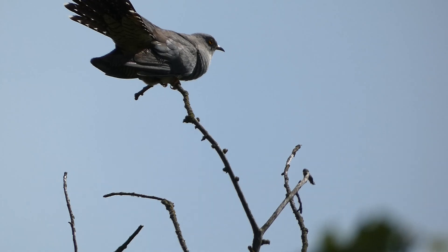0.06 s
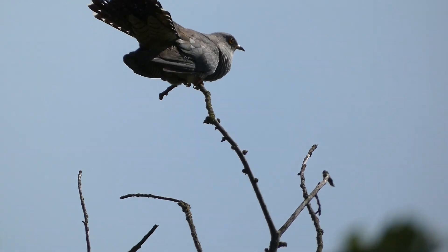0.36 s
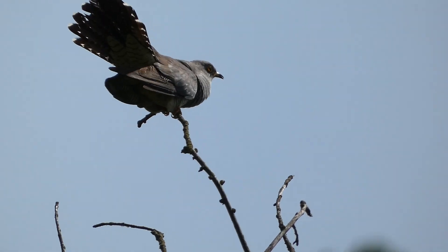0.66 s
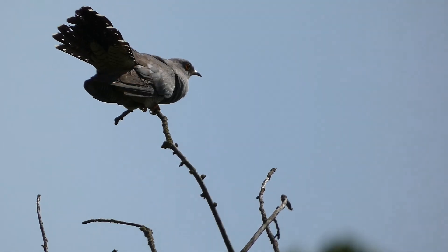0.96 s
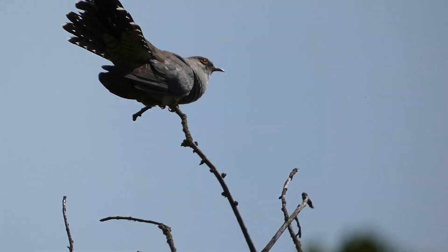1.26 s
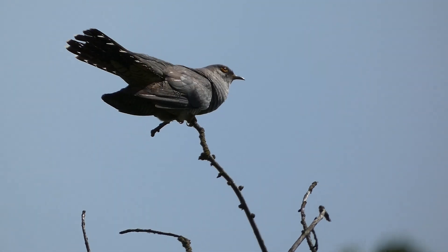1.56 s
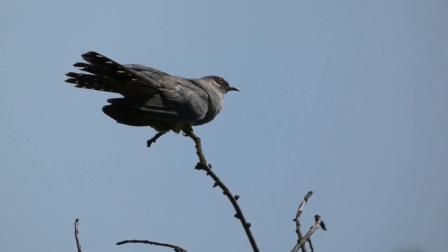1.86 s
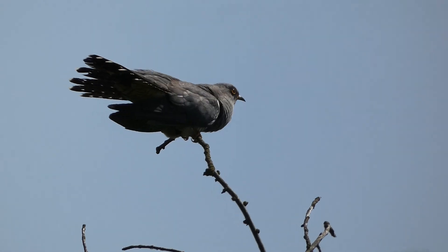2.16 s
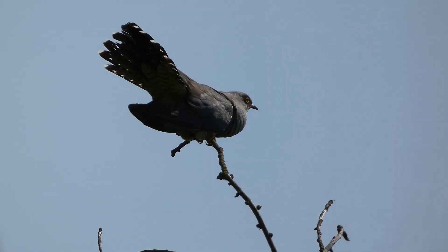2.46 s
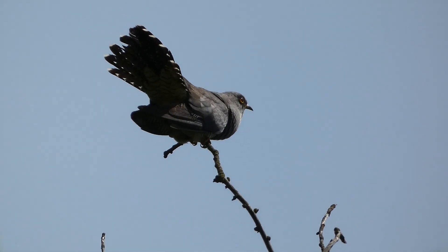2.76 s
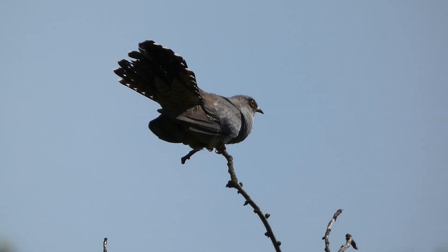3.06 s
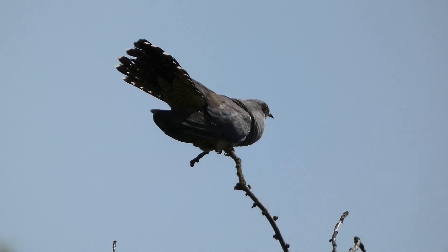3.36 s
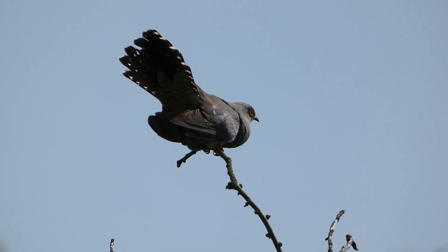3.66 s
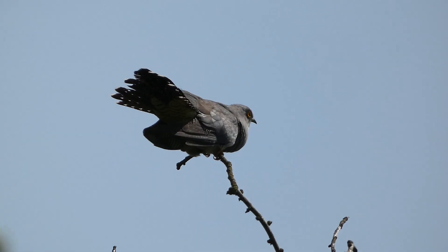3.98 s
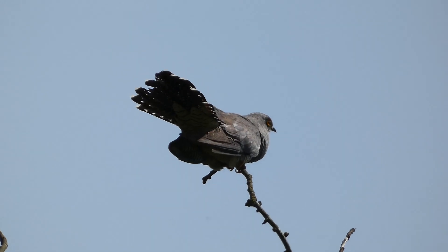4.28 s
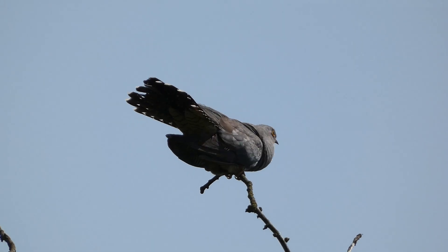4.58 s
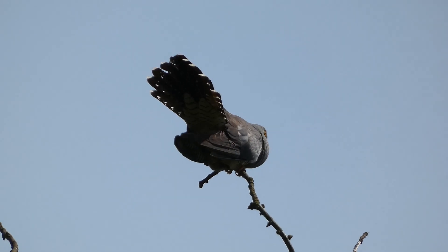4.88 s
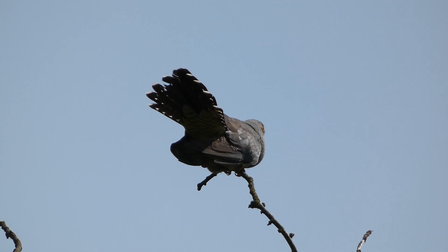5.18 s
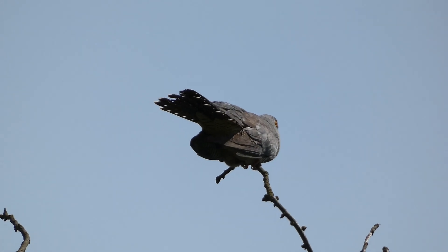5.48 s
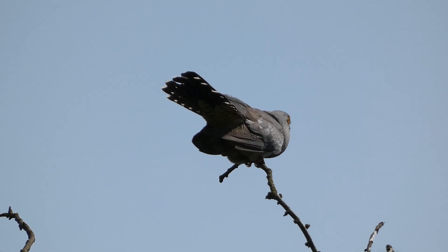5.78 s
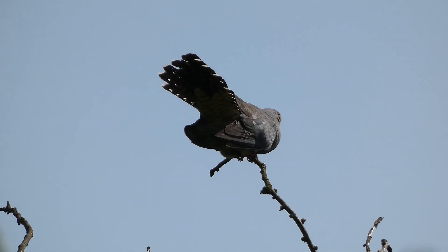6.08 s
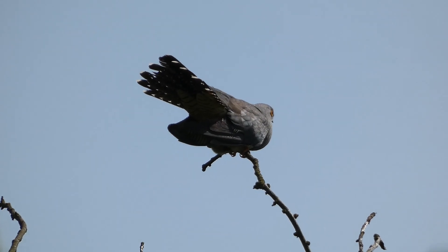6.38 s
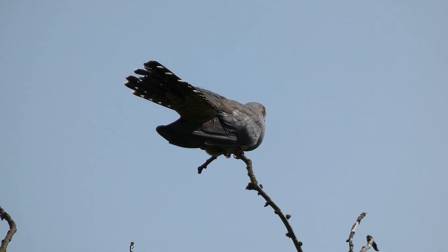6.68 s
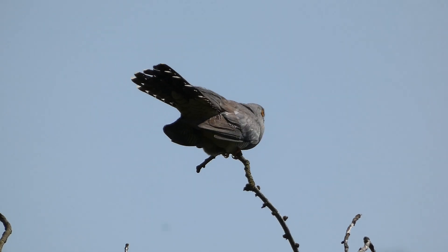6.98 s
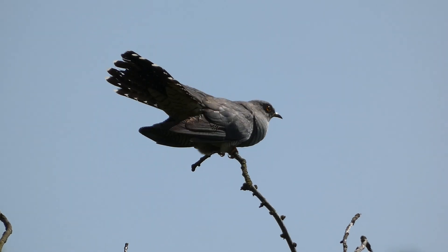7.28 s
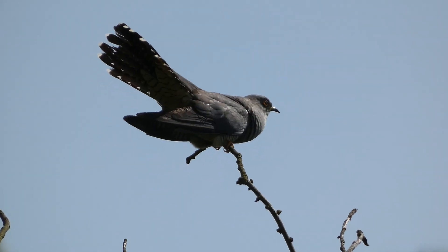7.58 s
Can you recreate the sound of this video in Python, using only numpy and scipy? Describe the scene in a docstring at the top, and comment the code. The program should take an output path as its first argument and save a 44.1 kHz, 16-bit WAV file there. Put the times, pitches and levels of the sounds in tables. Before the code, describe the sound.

Outdoors, a cuckoo near the microphone repeats its hollow, falling two-note call six times, a little over a second apart. Behind it, small birds chirp faintly, with a brief run of dry ticks early on, scattered twittering in the middle and a slightly nearer song with a trill towards the end. Far traffic makes a soft, steady wash with a thin motor whine.

```python
"""A cuckoo on a bare twig calls six times in open country: a short arched "cuck", then a level,
lower "oo", both almost pure tones from a closed bill and swollen throat.
Small songbirds whistle and tick further off, scattered by the trees, among faint rustles.
Behind them far traffic swells and fades in moving air, with a wavering motor whine and a low hum."""
import sys
import numpy as np
from scipy import signal
from scipy.fft import rfft, irfft
from scipy.io import wavfile
from scipy.ndimage import uniform_filter1d

SR = 44100
rng = np.random.default_rng(int(sys.argv[2]) if len(sys.argv) > 2 else 0)


def materialize(psi):
    """Save the field psi as 16-bit PCM at rate SR to the path in sys.argv[1].

    A 1-D psi becomes a single channel; in a 2-D psi each row is a channel.
    """
    bounded = np.clip(np.atleast_2d(psi).T, -1, 1)
    quanta = np.round(bounded * 32767).astype(np.int16)
    wavfile.write(sys.argv[1], SR, quanta)


N = 345744
T = np.arange(N) / SR

# Background noise spectra, low to high: freq_hz, density_db
RUMBLE_SPECTRUM = [(20, -19.5), (50, -11), (80, -6), (120, -0.5), (160, -2), (210, -4), (280, -9),
                   (400, -28.5)]
DRONE_SPECTRUM = [(230, -43), (300, -20.5), (350, -13), (385, -3.5), (412, 2), (450, -4.5), (500, -11),
                  (570, -27), (700, -52.5)]
ROAR_FAR_SPECTRUM = [(480, -41.5), (560, -19.5), (610, -14), (690, -3.5), (735, -4.5), (800, 3.5),
                     (860, -1), (940, -18.5), (1050, -36.5)]
ROAR_NEAR_SPECTRUM = [(400, -27.5), (480, -5.5), (550, -5.5), (665, 5), (735, 1.5), (782, 4), (850, -3),
                      (960, -15), (1100, -32)]
MURMUR_FAR_SPECTRUM = [(860, -21), (950, -6.5), (1030, -1), (1085, -18), (1165, 4), (1220, -4.5),
                       (1290, -13)]
MURMUR_NEAR_SPECTRUM = [(860, -6.5), (950, 5.5), (1030, 1), (1095, 2.5), (1170, 1), (1240, -10.5),
                        (1330, -15)]
RUSH_SPECTRUM = [(1150, -42.5), (1290, -6.5), (1410, 7), (1480, 10), (1550, 2), (1610, 8), (1680, -0.5),
                 (1760, -19.5), (1950, -42.5)]
TYRE_SPECTRUM = [(1550, -9.5), (1780, -2.5), (1910, 1), (2000, 1), (2090, 5), (2180, 4), (2330, -1),
                 (2490, -6.5), (2680, 1.5), (3000, -4), (3500, -5), (4100, -15), (4700, -35)]
HISS_SPECTRUM = [(3400, -12), (4200, -7), (4600, -5), (4950, 0.5), (5800, -3.5), (6400, -6.5), (7000, -6),
                 (7900, -14), (8600, -11), (9900, -9.5), (11500, -17), (12700, -21.5), (15200, -30)]
# Traffic envelopes, before trim and gusts: time_s, level_db
ROAR_ENVELOPE = [(0.34, -47.5), (0.7, -53.5), (1.06, -44.5), (1.42, -51.5), (1.66, -43), (2.14, -49.5),
                 (2.74, -41.5), (3.3, -42.5), (3.94, -43.5), (4.18, -35.5), (4.3, -41.5), (4.58, -37.5),
                 (4.95, -37), (5.38, -40), (5.58, -36), (5.98, -37), (6.46, -40), (7.82, -39)]
MURMUR_ENVELOPE = [(0.4, -58), (1.1, -54.5), (1.7, -56), (2.7, -60), (3.95, -50), (4.4, -55.5),
                   (5.6, -52.5), (6.6, -53.5), (7.8, -53)]
RUSH_ENVELOPE = [(0.34, -54.5), (1.42, -50), (2.98, -53), (4.06, -49.5), (6.34, -61.5), (6.58, -56.5),
                 (7.3, -62), (7.822, -60)]
TYRE_ENVELOPE = [(0.34, -61.5), (2.14, -56.5), (2.62, -55.5), (5.02, -57), (6.22, -59.5), (6.34, -56.5),
                 (7.82, -59)]
# Brief swells and dips of the roar: centre_s, half_width_s, gain_db
ROAR_BUMPS = [(.84, 0.028, 10), (1.08, 0.066, -1.5), (4.81, 0.091, -10.5), (7.6, 0.034, -7.5)]
# Motor whine swells: centre_s, half_width_s, level_db
MOTOR_SWELLS = [(2.05, 0.31, -54), (3.55, 0.22, -51.5), (4.08, 0.29, -48), (6.15, 0.14, -57.5),
                (6.58, 0.091, -48.5), (7.0, 0.53, -57)]
# Stray rustles: start_s, length_s, centre_hz, level_db, width_ratio
RUSTLE_PUFFS = [(0.817, 0.051, 5430, -58, 0.12), (1.068, 0.1, 1254, -47.5, 0.042),
                (2.183, 0.0079, 6350, -51, 0.29), (2.917, 0.076, 4700, -57.5, 0.071),
                (3.701, 0.2, 1020, -47, .056), (4.641, 0.11, 4840, -57, 0.052),
                (6.93, 0.11, 4900, -59, 0.078)]
# Scattering by trees: freq_hz, gain_db
FOLIAGE_SPECTRUM = [(200, -13), (600, 6), (3000, -7), (8000, -4)]

# Far songbird's twitter: start_s, length_s, centre_hz, level_db
TWITTER_BOUTS = [(3.563, .42, 3350, -53), (4.854, 0.45, 3340, -61)]
# Slurred whistles: start_s, length_s, start_hz, middle_hz, end_hz, level_db
FAR_WHISTLES = [(0.332, 0.13, 3500, 3064, 2880, -47.5), (0.56, 0.067, 4050, 3950, 3830, -55.5),
                (0.627, 0.076, 3820, 3420, 3290, -46.5), (1.412, 0.059, 3270, 3380, 3090, -49.5),
                (1.466, 0.046, 3180, 2984, 2990, -51), (1.946, 0.093, 3264, 3200, 2910, -43.5),
                (3.057, 0.054, 3860, 3920, 3970, -57), (3.499, .065, 3720, 3610, 3540, -53),
                (3.563, 0.052, 3550, 3380, 3230, -48.5), (3.669, 0.077, 3210, 3096, 3240, -46.5),
                (3.851, 0.043, 3230, 3073, 3060, -49), (4.066, 0.041, 4520, 4190, 4100, -59),
                (4.134, .028, 3600, 3220, 2920, -49), (4.143, .07, 3700, 3500, 3450, -61),
                (4.22, 0.1, 3240, 3118, 3344, -44), (4.332, 0.021, 2640, 2860, 3080, -50),
                (4.354, 0.024, 3150, 2770, 2470, -54), (4.373, 0.024, 2250, 2690, 3000, -48),
                (4.444, .095, 3720, 3746, 3800, -49.5), (4.755, 0.04, 3210, 3170, 3280, -48.5),
                (4.792, .03, 3250, 3450, 3480, -59), (4.816, 0.019, 3400, 3150, 2880, -55),
                (4.883, .025, 3950, 3790, 3660, -55), (4.907, 0.063, 3370, 3058, 3154, -45.5),
                (5.034, 0.073, 3240, 3245, 3030, -49.5), (5.12, 0.053, 2985, 2890, 2900, -46),
                (5.175, 0.034, 3120, 3280, 3400, -57), (5.228, 0.047, 3960, 3830, 3450, -55)]
NEAR_WHISTLES = [(5.913, 0.011, 3350, 3030, 2600, -49), (5.936, 0.011, 2640, 2950, 3180, -48.5),
                 (5.982, 0.013, 2250, 2600, 3070, -57), (6.018, 0.083, 2185, 2620, 2830, -46.5),
                 (6.281, 0.028, 2900, 3060, 2530, -45), (6.304, 0.083, 2443, 2500, 2630, -47.5),
                 (6.404, .034, 1800, 1980, 1980, -52), (6.461, .026, 2950, 3070, 3050, -50),
                 (6.508, .016, 3400, 3900, 4650, -56.5), (6.528, 0.028, 3000, 2950, 2390, -39.5),
                 (6.555, 0.069, 2480, 2410, 2640, -48), (6.674, 0.016, 1900, 1990, 2040, -48.5),
                 (6.922, 0.015, 4500, 5000, 5100, -54), (6.96, 0.021, 3280, 3770, 4260, -53.5),
                 (6.981, .016, 4200, 3930, 3100, -53), (7.056, 0.027, 5630, 5000, 4750, -50.5),
                 (7.084, 0.012, 4750, 4150, 3850, -54), (7.164, 0.049, 2290, 2450, 2760, -43.5),
                 (7.194, 0.065, 2514, 2724, 2750, -38.5), (7.468, 0.018, 3560, 3590, 3600, -50.5)]
# Near songbird's downward flicks: start_s, start_hz, level_db
NEAR_CHIPS = [(6.282, 2716, -42), (6.435, 2600, -46), (6.578, 2688, -39), (6.726, 2690, -40.5),
              (6.867, 2780, -43.5), (7.001, 2870, -41), (7.143, 3000, -44.5)]
# Its held notes with a dip: start_s, length_s, pitch_hz, level_db
NEAR_DIPPED_NOTES = [(6.103, .112, 3430, -50), (7.272, .12, 3527, -45.5)]
# Even run of scolding ticks: start_s, level_db
SCOLD_TICKS = [(2.078, -47), (2.187, -47), (2.295, -47), (2.404, -47.5), (2.511, -46.5), (2.618, -46.5),
               (2.724, -46.5)]
# One tick: time_s, pitch_ratio, gain_db
TICK_SHAPE = [(0, 1, -17), (.0045, .86, -2), (.0085, .7, 0), (.013, .59, -3), (.018, .535, -2.5),
              (.025, .52, -9)]

# Cuckoo's first syllable: peak_s, top_hz, peak_db, flank_swell_ratio
CUCK_NOTES = [(.8306, 672, -15, 0.27), (2.2088, 678, -16, 0.39), (3.4577, 667.5, -16, 0.4),
              (4.6754, 671, -14, 0.45), (5.934, 664.6, -15.5, 0.61), (7.1453, 660.4, -15.0, 0.59)]
# One "cuck": from_peak_s, pitch_ratio, gain_db
CUCK_SHAPE = [(-.062, 0.915, -48.5), (-.05, .85, -24.5), (-.04, .88, -22), (-.026, 0.94, -16),
              (-.013, 1, -5.5), (-.003, 0.99, 0), (.007, 0.97, -2), (0.016, .885, -11.5),
              (0.027, 0.846, -11), (.03, 0.894, -17.5), (0.039, 0.96, -46.5)]
# Second syllable: start_s, length_s, pitch_hz, held_db
OO_NOTES = [(1.019, .188, 515, -18.4), (2.398, .188, 515, -18.8), (3.642, .19, 515, -18.7),
            (4.865, .191, 516, -17.7), (6.126, .189, 519, -18.5), (7.339, .189, 517, -17.6)]
# Faint noise round the cuckoo's tone: freq_hz, density_db
HUSK_SPECTRUM = [(60, -16.5), (250, -0.5), (700, -0.5), (1300, 0.5), (2500, -7.5), (4000, -12),
                 (5500, -16.5), (10000, -21), (14000, -34)]


def from_db(db):
    """Decibels to gain."""
    return 10 ** (np.asarray(db) / 20)


def unit_rms(x):
    """Scale to unit rms."""
    return x / np.sqrt(np.mean(x ** 2) + 1e-20)


def interp_columns(rows, at):
    """Interpolate each later column along the first."""
    first, *columns = np.transpose(rows)
    return [np.interp(at, first, column) for column in columns]


def bump(t, centre_s, half_width_s):
    """Gaussian of unit height."""
    return np.exp(-((t - centre_s) / half_width_s) ** 2)


def drift(rate_hz):
    """Unit-rms wander, from about rate_hz / 10 to rate_hz."""
    count = N // 40
    ratio = np.arange(count // 2 + 1) * SR / N / rate_hz
    band = np.minimum(10 * ratio, 1) / (1 + ratio ** 2) ** 2
    slow = irfft(rfft(rng.standard_normal(count)) * band, count)
    return np.interp(T, np.linspace(0, T[-1], count), unit_rms(slow))


def noise(spectrum):
    """Unit-rms shaped noise, rolled off beyond the spectrum's ends."""
    log_hz = np.log(np.maximum(np.arange(N // 2 + 1) * SR / N, 1))
    hz, db = np.transpose(spectrum)
    outside = abs(log_hz - np.clip(log_hz, np.log(hz[0]), np.log(hz[-1])))
    gain = from_db(np.interp(log_hz, np.log(hz), db) - 170 * outside)
    return unit_rms(irfft(rfft(rng.standard_normal(N)) * gain, N))


def phase_of(hz):
    """Running phase of a moving pitch."""
    return 2 * np.pi * np.cumsum(hz) / SR


def add(track, start_s, sound):
    """Mix a sound in at start_s."""
    i = int(start_s * SR)
    track[i:i + len(sound)] += sound[:N - i]


def hum(pitch_hz=78, tone_db=-72, octave_db=-13, rumble_db=-75):
    """Faint steady hum over a little rumble."""
    phase = phase_of(pitch_hz + .75 * drift(2))
    tone = np.sqrt(2) * (np.sin(phase) + from_db(octave_db) * np.sin(2 * phase))
    return from_db(tone_db + drift(3.5)) * tone + from_db(rumble_db) * noise(RUMBLE_SPECTRUM)


def gusts(depth_db, rate_hz):
    """Wavering gain from moving air."""
    return from_db(depth_db * drift(rate_hz))


def traffic(approach_s=(.51, 4.53), gust_db=1.93):
    """Far traffic in wavering noise bands; the roar fills out downwards as it nears."""
    def envelope(rows, trim_db):
        return from_db(interp_columns(rows, T)[0] + trim_db)

    near = np.interp(T, approach_s, (0, 1))
    far_gain, near_gain = np.sqrt(1 - near), np.sqrt(near)
    bumps_db = sum(db * bump(T, centre_s, width_s) for centre_s, width_s, db in ROAR_BUMPS)
    roar = far_gain * noise(ROAR_FAR_SPECTRUM) + near_gain * noise(ROAR_NEAR_SPECTRUM)
    murmur = far_gain * noise(MURMUR_FAR_SPECTRUM) + near_gain * noise(MURMUR_NEAR_SPECTRUM)
    drone, rush = noise(DRONE_SPECTRUM), noise(RUSH_SPECTRUM)
    drone *= gusts(gust_db, 23) * from_db(-48 + 1.46 * near + .5 * bumps_db)
    roar *= gusts(gust_db, 23) * envelope(ROAR_ENVELOPE, trim_db=-.96) * from_db(bumps_db)
    rush *= gusts(gust_db, 23) * envelope(RUSH_ENVELOPE, trim_db=.5)
    murmur *= gusts(1.5, 15) * envelope(MURMUR_ENVELOPE, trim_db=-1)
    tyres = gusts(.8, 19) * envelope(TYRE_ENVELOPE, trim_db=4) * noise(TYRE_SPECTRUM)
    hiss = gusts(.83, 19) * from_db(-62 + 2.5 * near) * noise(HISS_SPECTRUM)
    return drone + roar + murmur + rush + tyres + hiss


def motor(start_hz=1585, sag_hz_per_s=4.6, wander_hz=9, wobble_hz=8.6, floor_db=-65, lower_db=-52):
    """Far whine on two lines an octave apart; the upper swells when the air carries it."""
    phase = phase_of(start_hz - sag_hz_per_s * T + wander_hz * drift(5.02) + wobble_hz * drift(47))
    swells = sum(from_db(db) * bump(T, centre_s, width_s) for centre_s, width_s, db in MOTOR_SWELLS)
    upper = (from_db(floor_db) + swells) * gusts(2.5, 41) * np.sin(phase)
    lower = from_db(lower_db) * np.minimum(T / 2.6, 1) * gusts(2.5, 28) * np.sin(phase / 2)
    return np.sqrt(2) * (upper + lower)


def rustles():
    """Soft noise puffs, each round its own pitch."""
    out = np.zeros(N)
    skirt = [(-3, -25), (-1, -6), (0, 0), (1, -6), (3, -25)]   # offset_widths, gain_db
    for start_s, length_s, centre_hz, level_db, width in RUSTLE_PUFFS:
        puff = noise([(centre_hz * (1 + width) ** offset, db) for offset, db in skirt])
        count = int(length_s * SR)
        add(out, start_s, from_db(level_db) * puff[:count] * np.hanning(count))
    return out


def trees(x, t60_s, build_s):
    """Diffuse echo from trunks and leaves: builds up, then decays."""
    tail = noise(FOLIAGE_SPECTRUM) * from_db(-60 * T / t60_s) * (1 - bump(T, 0, build_s))
    return signal.fftconvolve(x, tail[:SR] / np.sqrt(np.sum(tail ** 2)))[:N]


def chirp(hz, level_db, taper=.4):
    """Soft-edged sine following a pitch curve."""
    edges = signal.windows.tukey(len(hz), taper)
    return np.sqrt(2) * from_db(level_db) * edges * np.sin(phase_of(hz))


def whistle(length_s, start_hz, middle_hz, end_hz, level_db, quaver=.0066):
    """Parabolic glide with slightly unsteady pitch."""
    progress = np.linspace(0, 1, int(length_s * SR))
    parabola = np.polyfit([0, .5, 1], [start_hz, middle_hz, end_hz], 2)
    jitter = np.interp(progress * length_s, np.linspace(0, .25, 90), rng.standard_normal(90))
    return chirp(np.polyval(parabola, progress) * (1 + quaver * jitter), level_db)


def twitter(notes_per_s=14, note_s=.03, spread=.12, glide=.073):
    """Faint, loosely timed notes, each gliding up or down round a random pitch."""
    out = np.zeros(N)
    for start_s, length_s, centre_hz, level_db in TWITTER_BOUTS:
        for slot_s in np.arange(start_s, start_s + length_s, 1 / notes_per_s):
            late, detune, slope = rng.uniform(-1, 1, size=3)
            hz = centre_hz * (1 + spread * detune)
            step_hz = hz * glide * slope
            note = whistle(note_s, hz + step_hz, hz, hz - step_hz, level_db)
            add(out, slot_s + .14 * late / notes_per_s, note)
    return out


def far_songbird():
    """Slurs over twitter, deep in the trees: twigs blur each note, swaying branches answer later."""
    song = twitter()
    for start_s, *note in FAR_WHISTLES:
        add(song, start_s, whistle(*note, quaver=.012))
    song *= from_db(1.7 * drift(60))
    blur = from_db(-9) * trees(song, t60_s=.09, build_s=.0014)
    echo = from_db(-5 + 1.5 * drift(70)) * trees(song, t60_s=.45, build_s=.008)
    return from_db(-2) * song + blur + echo


def scolding(start_hz=4250, scatter_from_hz=2600):
    """Dry ticks: fast falling sweeps that level out, scattered by the leaves of a bush."""
    t = np.arange(0, TICK_SHAPE[-1][0], 1 / SR)
    pitch_ratio, shape_db = interp_columns(TICK_SHAPE, t)
    ticks = np.zeros(N)
    for start_s, level_db in SCOLD_TICKS:
        add(ticks, start_s, chirp(start_hz * pitch_ratio, level_db + shape_db, taper=.1))
    ticks *= from_db(2.5 * drift(300))
    treble = signal.sosfilt(signal.butter(2, scatter_from_hz, "high", fs=SR, output="sos"), ticks)
    blur = from_db(-1) * trees(treble, t60_s=.08, build_s=.0015)
    spray = from_db(3.5) * trees(treble, t60_s=.26, build_s=.004)
    return from_db(-2.5) * ticks + blur + spray


def dipped_whistle(length_s, pitch_hz, level_db, fall=.21):
    """High held note that flicks down and back near its middle."""
    t = np.arange(0, length_s, 1 / SR)
    dip = bump(t, .58 * length_s, half_width_s=.01)
    return chirp(pitch_hz * (1 - fall * dip), level_db)


def trill(length_s=.11, pitch_hz=3050, level_db=-35.5, attack_s=.035, hold_s=.05, rate_hz=54):
    """Note that scoops up, holds, then breaks into a softer warble."""
    t = np.arange(0, length_s, 1 / SR)
    scoop = .35 * np.exp(-t / .004)
    warbling = np.clip((t - hold_s) * rate_hz + .5, 0, 1)
    warble = .08 * warbling * np.sin(2 * np.pi * rate_hz * (t - hold_s))
    attack = np.sqrt(np.minimum(t / attack_s, 1))
    return attack * chirp(pitch_hz * (1 - scoop - warble), level_db - 2.5 * warbling, taper=.08)


def near_songbird(chip_s=.0203, chip_fall=.216, trill_start_s=6.773):
    """One clear phrase of slurs, chips, dipped notes and a trill, with a light tree echo."""
    song = np.zeros(N)
    for start_s, *note in NEAR_WHISTLES:
        add(song, start_s, whistle(*note))
    for start_s, hz, level_db in NEAR_CHIPS:
        fall_hz = hz * chip_fall
        add(song, start_s, whistle(chip_s, hz, hz - .596 * fall_hz, hz - fall_hz, level_db))
    for start_s, *note in NEAR_DIPPED_NOTES:
        add(song, start_s, dipped_whistle(*note))
    add(song, trill_start_s, trill())
    song *= from_db(1.5 * drift(110))
    echo = from_db(-7 + 1.8 * drift(90)) * trees(song, t60_s=.5, build_s=.008)
    blur = from_db(-11) * trees(song, t60_s=.09, build_s=.0014)
    return from_db(-.5) * song + blur + echo


def huskiness(call, gain_db=-40):
    """Faint noise round the cuckoo's tone, rising and falling with the call's loudness."""
    power = np.maximum(uniform_filter1d(call ** 2, size=400), 0)
    return from_db(gain_db) * power / np.sqrt(power.max()) * noise(HUSK_SPECTRUM)


def hoot(hz, level_db, second_db=-50, third_db=-46):
    """Closed bill and swollen throat leave an almost pure tone."""
    phase = phase_of(hz)
    overtones = from_db(second_db) * np.sin(2 * phase) + from_db(third_db) * np.sin(3 * phase)
    return from_db(level_db) * (np.sin(phase) + overtones)


def oo(length_s, pitch_hz, held_db, attack_s=.021, release_s=.024, rise=.028):
    """Second syllable: swells, holds and stops while the pitch creeps up."""
    t = np.arange(0, length_s, 1 / SR)
    attack = 1 - np.exp(-t / attack_s)
    release = np.sin(np.pi / 2 * np.minimum((length_s - t) / release_s, 1)) ** 2
    return attack * release * hoot(pitch_hz * (1 + rise * (t / length_s - .5)), held_db)


def cuckoo(flutter_db=.67):
    """Arched "cuck", then "oo"; each cuck has its own level and flank fullness."""
    t = np.arange(CUCK_SHAPE[0][0], CUCK_SHAPE[-1][0], 1 / SR)
    pitch_ratio, shape_db = interp_columns(CUCK_SHAPE, t)
    edges = signal.windows.tukey(len(t), .13)
    out = np.zeros(N)
    for peak_s, top_hz, peak_db, swell in CUCK_NOTES:
        cuck = edges * hoot(top_hz * pitch_ratio, peak_db + shape_db * (1 - swell))
        add(out, peak_s + t[0], cuck)
    for start_s, *note in OO_NOTES:
        add(out, start_s, oo(*note))
    return out * from_db(flutter_db * drift(150))


def scene():
    """Mono mix: near, almost dry cuckoo over songbirds and traffic."""
    call = cuckoo()
    echo = from_db(-32) * trees(call, t60_s=.35, build_s=.012)
    birds = call + huskiness(call) + echo + far_songbird() + near_songbird() + scolding()
    return (birds + rustles() + traffic() + motor() + hum())[None]


def record(dry, open_s=.303, fade_db=-7, fade_s=.18, cutoff_hz=15350):
    """Brief silence, fade-in, steep low-pass."""
    gate = 1 / (1 + np.exp(-(T - open_s) / .003))
    fade = from_db(fade_db * np.exp(-np.maximum(T - open_s, 0) / fade_s))
    lowpass = signal.ellip(10, .1, 90, cutoff_hz, fs=SR, output="sos")
    return signal.sosfilt(lowpass, dry * gate * fade)


dry = scene()
out = record(dry)
materialize(out)
```